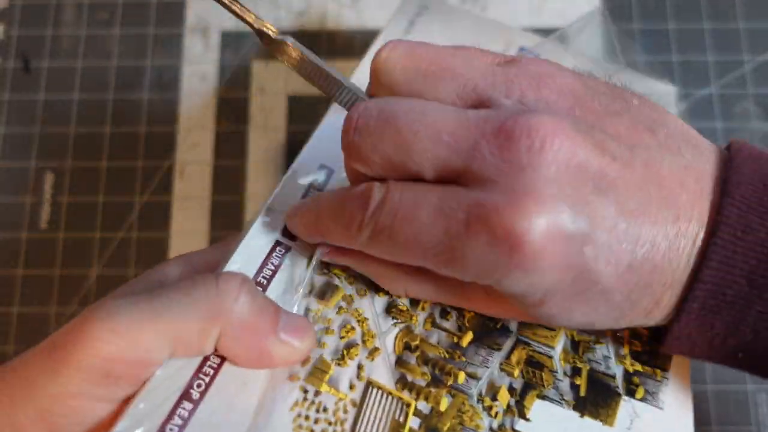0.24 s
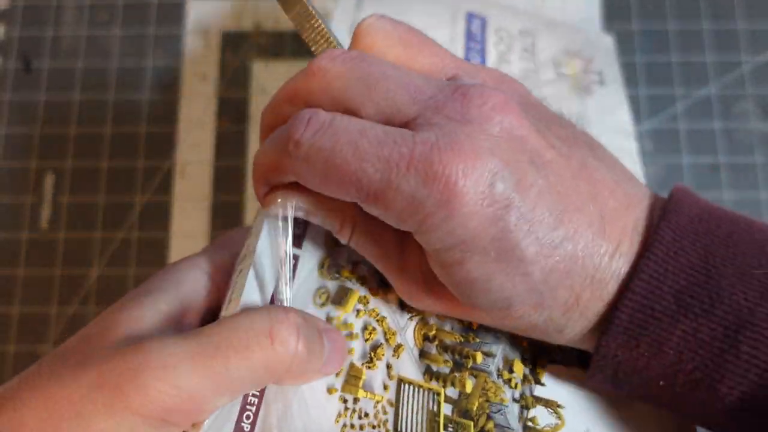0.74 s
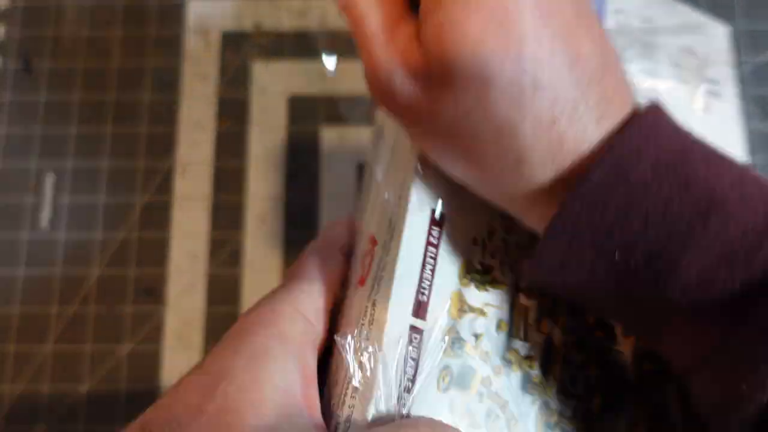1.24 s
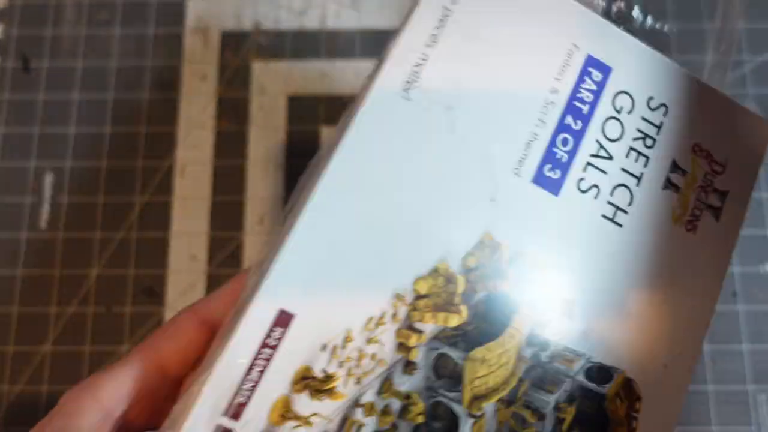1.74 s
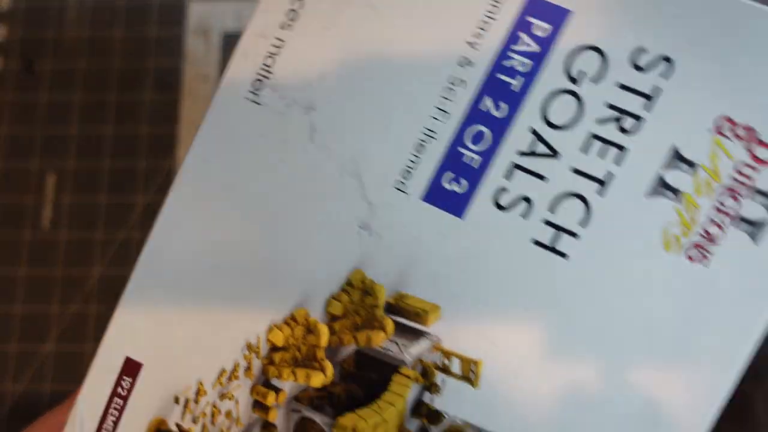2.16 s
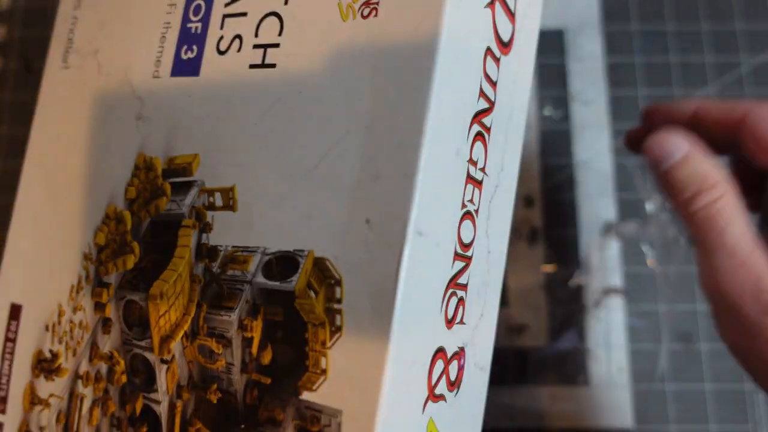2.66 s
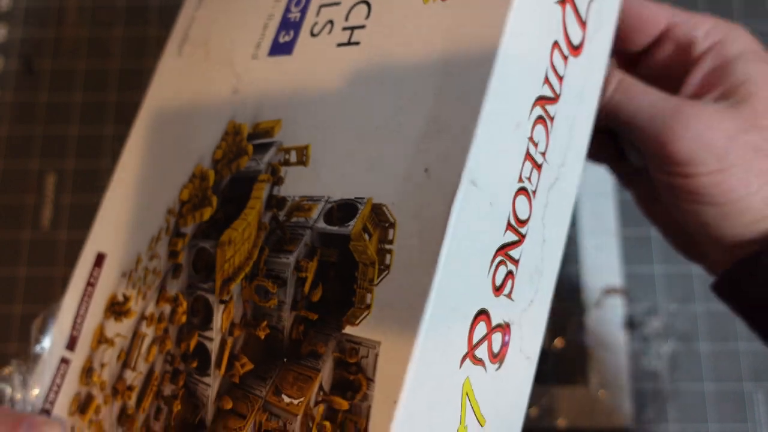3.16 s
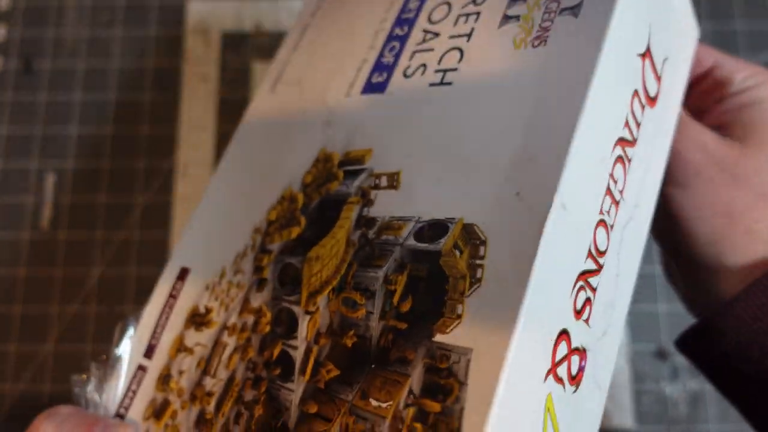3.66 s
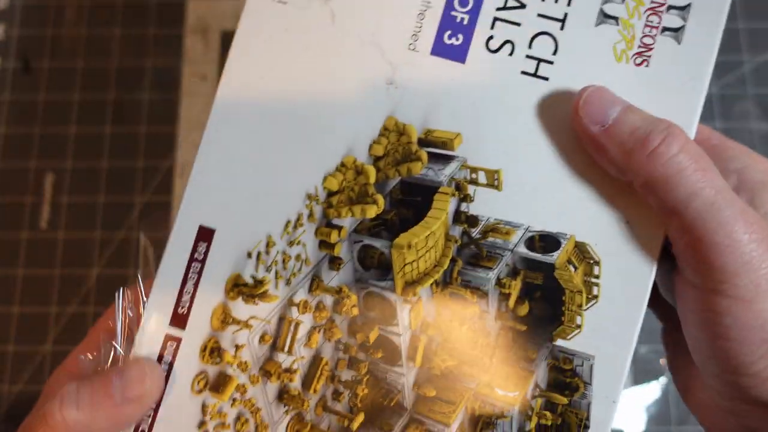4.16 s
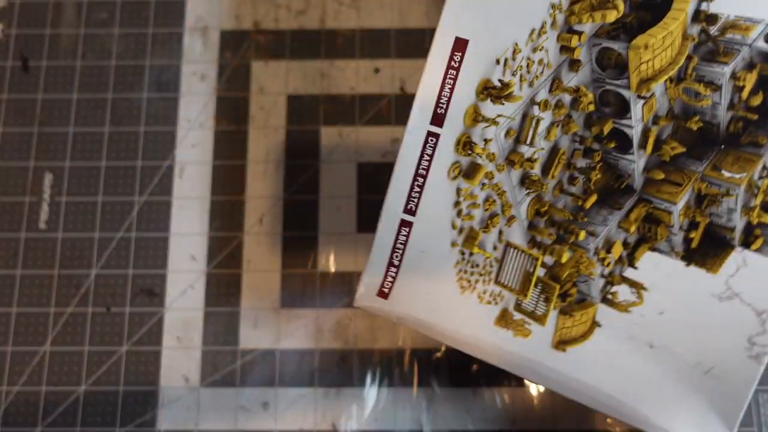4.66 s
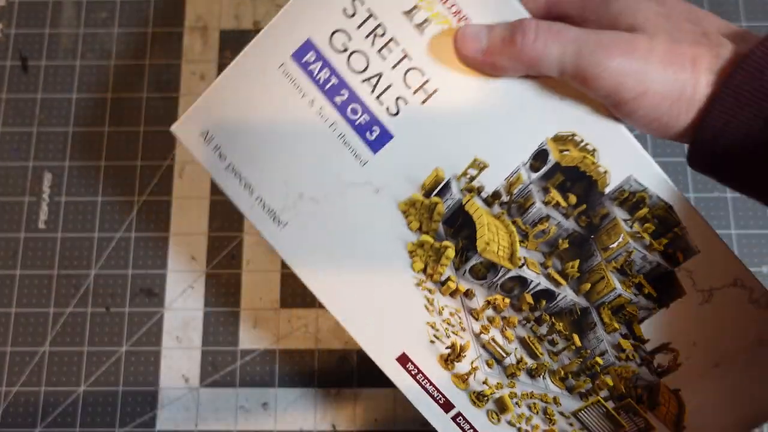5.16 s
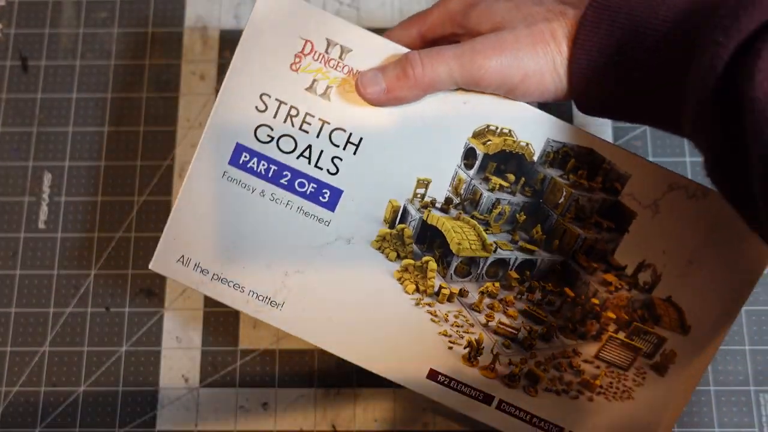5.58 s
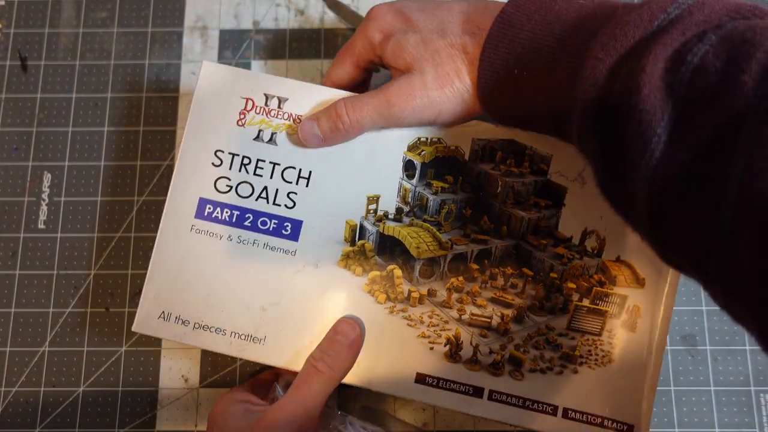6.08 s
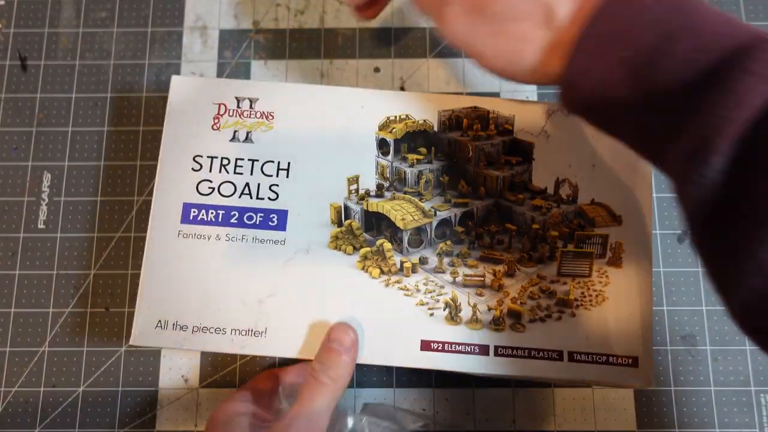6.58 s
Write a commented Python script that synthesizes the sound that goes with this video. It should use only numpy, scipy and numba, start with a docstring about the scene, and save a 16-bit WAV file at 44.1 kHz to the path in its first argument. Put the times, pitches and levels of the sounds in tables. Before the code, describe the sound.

Hands tear thin plastic wrap from a cardboard box: bright crackling comes in quick tugs, with sharp snaps and dull hollow knocks, strongest around one second. Peeling swishes continue, thin out to lighter handling, then surge again past four seconds. Softer crinkles and small bumps end it. Close stereo microphone, small quiet room, short reverberation.

```python
"""Shrink-wrap film torn and peeled off a cardboard box by hand: swarms of buckling clicks, a swish, louder snaps.
Random clicks and noise through resonances make the film; friction is dense stick-slip clicks.
Knocks excite the modes of the box, loose contents patter on its walls, drags sweep a hollow resonance.
Close reflections and a short reverberant tail answer; a quiet room background lies beneath."""
import sys
import numpy as np
from scipy import signal
from scipy.fft import rfft, irfft
from scipy.io import wavfile
from scipy.ndimage import uniform_filter1d
from numba import njit

SR = 44100
rng = np.random.default_rng(int(sys.argv[2]) if len(sys.argv) > 2 else 0)


def int16_out(signal):
    """Quantize to a 16-bit WAV file."""
    q = np.round(np.clip(np.atleast_2d(signal).T, -1, 1) * 32767)
    wavfile.write(sys.argv[1], SR, q.astype(np.int16))


N = 300759
TIME = np.arange(N) / SR


def undb(db):
    """Decibels to amplitude gain."""
    return 10 ** (np.asarray(db) / 20)


def unit(x):
    """Scale to rms 1."""
    return x / np.sqrt(np.mean(x ** 2) + 1e-18)


def at_level(sound, level_db):
    """Give a short sound the energy of 10 ms at this rms level."""
    return sound * undb(level_db) * np.sqrt(SR / 100) / np.linalg.norm(sound)


def add(track, start_s, sound):
    """Mix a sound into a track, cut at the track's end."""
    i = max(int(start_s * SR), 0)
    track[i:i + len(sound)] += sound[:max(N - i, 0)]


def resonate(x, hz, width_hz):
    """Two-pole resonance, gain 1 at its centre."""
    hz = min(hz, SR * 0.45)
    b, a = signal.iirpeak(hz, hz / min(width_hz, SR / 3), SR)
    return signal.lfilter(b, a, x)


def colour(x, points, size=2048):
    """Minimum-phase filter with the given (hz, gain_db) outline; clicks keep their sharp front."""
    hz, gain_db = np.transpose(points)
    bins_hz = np.maximum(np.fft.rfftfreq(size, 1 / SR), 1)
    outline_db = np.interp(np.log(bins_hz), np.log(hz), gain_db)
    cepstrum = irfft(np.log(undb(outline_db)))
    # fold the cepstrum onto positive time
    cepstrum[1:size // 2] *= 2
    cepstrum[size // 2 + 1:] = 0
    impulse = irfft(np.exp(rfft(cepstrum)))
    return signal.fftconvolve(x, impulse)[:len(x)]


def clicks(spread_db, count):
    """Sample positions and signed sizes of random clicks: many small, a few large."""
    when, size, sign = rng.random((count, 3)).T
    rarity = -np.log(size + 1 / 400)
    return (when * N).astype(int), np.sign(sign - 0.5) * undb(spread_db * rarity)


def steady(x, span_s):
    """Level out the running power, keeping the grain finer than span_s."""
    size = max(int(span_s * SR), 8)
    power = uniform_filter1d(uniform_filter1d(unit(x) ** 2, size), size)
    return unit(x) / np.sqrt(np.abs(power) + 1e-6)


def walk(count):
    """Random wander: straight lines between count normal draws spread over the scene."""
    return np.interp(TIME, np.linspace(0, TIME[-1], count), rng.standard_normal(count))


def burst(length_s, follow, size):
    """One pulse of height 1, then a decaying random run; follow is the run's norm before the pulse is set."""
    t_s = np.arange(size) / SR
    run = rng.standard_normal(size) * undb(6.46 * rng.standard_normal(size))
    run *= np.exp(-t_s / max(length_s, 1e-4))
    push = follow * run / np.linalg.norm(run)
    push[0] = 1
    return push


def swell(peak_s, build_s, let_go_s, swell_db=11):
    """Gain of a movement: rises by swell_db over build_s, falls by it over let_go_s, same slopes beyond."""
    before = (peak_s - TIME) / max(build_s, 0.005)
    after = (TIME - peak_s) / max(let_go_s, 0.005)
    return undb(-np.minimum(swell_db * np.maximum(before, after), 200))


# tugs at the film; tautness sets brightness:
# peak_s, build_s, let_go_s, crinkle_db, friction_db, bright_db_per_octave
TUG_TABLE = [(0.01, 0.023, 0.035, -36.5, -41.5, 6), (0.16, 0.029, 0.054, -32.5, -40, 6),
             (0.29, 0.23, 0.22, -31.5, -39.5, -1), (0.605, .06, 0.063, -35, -44, -3.5),
             (0.77, 0.12, 0.24, -44.5, -45, 0), (0.975, 0.056, 0.045, -29, -35, 0),
             (1.13, .1, 0.048, -37, -41.5, -5), (1.265, 0.1, 0.1, -29.5, -33.5, 4),
             (1.44, .08, 0.14, -33.5, -54, -2), (1.59, 0.12, 0.38, -37, -45, 0.5),
             (1.88, .11, 0.072, -26.5, -34, 2), (2.09, 0.23, 0.21, -35, -59, -2.5),
             (2.23, .07, 0.19, -35.5, -42.5, 1), (2.5, 0.074, 0.21, -44.5, -56, -4),
             (3.0, .17, 0.14, -38.5, -44.5, 6), (3.2, 0.11, 0.24, -41, -65, 0.5),
             (3.365, 0.071, .07, -38.5, -38.5, -2), (3.7, .2, 0.18, -49, -62, 2),
             (3.92, 0.12, .25, -37.5, -47, 2.5), (4.06, 0.1, 0.13, -37, -41.5, 3),
             (4.24, 0.14, 0.069, -29.5, -33, 14), (4.35, 0.059, 0.073, -24, -31, 1),
             (4.56, 0.091, 0.099, -35.5, -44, -0.5), (4.74, 0.088, 0.1, -27.5, -38, 1.5),
             (4.865, 0.15, .05, -34, -34, 0), (5.16, 0.16, .25, -37.5, -41, 2),
             (5.42, 0.11, .3, -34.5, -43, -1.5), (5.615, 0.082, 0.039, -31.5, -37.5, -0.5),
             (5.76, 0.068, 0.19, -44, -42, -2), (5.97, 0.088, 0.13, -40.5, -48.5, -1),
             (6.21, 0.057, 0.034, -42, -53, -4), (6.41, 0.13, 0.1, -46, -53, -4),
             (6.6, 0.038, 0.076, -48.5, -58, -5.5), (6.81, 0.091, .1, -35.5, -54, -3)]


def tugging():
    """Crinkle dB, friction dB, brightness: overlapping tugs add in power, which also weights the tautness."""
    film, friction, bright = 0, 0, 0
    for peak_s, build_s, let_go_s, film_db, friction_db, bright_db in TUG_TABLE:
        effort = swell(peak_s, build_s, let_go_s)
        power = (effort * undb(film_db)) ** 2
        film = film + power
        bright = bright + bright_db * power
        friction = friction + (effort * undb(friction_db)) ** 2
    return 10 * np.log10(film), 10 * np.log10(friction), bright / film


# colour of the crinkling film: hz, gain_db
FILM_COLOUR = [(150, -23), (400, -26), (1000, -17.5), (2000, -7.5), (4000, -1), (6000, 0.5), (8500, 1.5),
               (12000, -1.5), (16000, -8)]


def crinkle(bright_db, pull_db, spread_db=2.0, patchy_db=6, relative_width=0.6, bunch_db=4,
            swish_db=-5, swish_db_per_db=0.38, flutter_db=3):
    """Film facets buckle in bunches, ringing random mixes of broad bands; a strong pull merges them into a swish."""
    at, size = clicks(spread_db, count=14000)
    bunches = walk(count=700)
    size = size * undb(bunch_db * bunches[at])
    crackle, swish = np.zeros(N), np.zeros(N)
    for k, hz in enumerate(np.geomspace(600, 15000, 11)):
        width_hz = hz * relative_width
        tilt_db = bright_db * np.log2(hz / 8000)
        facet = undb(patchy_db * rng.standard_normal(len(at)) + tilt_db[at])
        pulses = np.bincount(at, size * facet, N)
        crackle += (-1) ** k * resonate(pulses, hz, width_hz)
        flutter = flutter_db * (bunches + walk(count=300)) / np.sqrt(2)
        noise = rng.standard_normal(N) * undb(tilt_db + flutter)
        swish += resonate(noise, hz, width_hz)
    crackle = steady(colour(crackle, FILM_COLOUR), span_s=0.03)
    swish = steady(colour(swish, FILM_COLOUR), span_s=0.03)
    merged = undb(swish_db + swish_db_per_db * (pull_db - np.median(pull_db)))
    return (crackle + merged * swish) / np.sqrt(1 + merged ** 2)


def small_snaps(film_db, above_db=-4, spread_db=4, follow_db_per_db=0.69, centre_hz=7600,
                spread_octaves=0.43, length_s=0.0024, count=70):
    """Lesser creases flip at random, louder under a harder pull; rows as in SNAP_TABLE."""
    when, size, pitch = rng.random((count, 3)).T
    # one per equal slot of time
    at = ((np.arange(count) + when) / count * (N - 1)).astype(int)
    usual_db = np.median(film_db)
    level_db = usual_db + follow_db_per_db * (film_db[at] - usual_db)
    level_db = level_db + above_db + spread_db * (2 * size - 1)
    hz = centre_hz * 2 ** (spread_octaves * (2 * pitch - 1))
    return list(zip(at / SR, level_db, hz, np.full(count, length_s)))


# creases that snap and short rips; level over 10 ms before the final colour, length before stretch:
# start_s, level_db, centre_hz, length_s
SNAP_TABLE = [(0.129, -29.5, 6450, 0.0045), (0.219, -21, 4450, 0.0054), (0.3405, -32, 4790, .0024),
              (0.451, -35, 7000, .001), (0.4549, -26, 8130, .002), (0.6997, -34, 6900, 0.0014),
              (0.775, -38.5, 4040, 0.0015), (0.864, -41, 5600, 0.0013), (0.952, -30.5, 2040, 0.0038),
              (0.985, -33, 1920, 0.0046), (1.1093, -27.5, 4300, 0.0012), (1.122, -31.5, 5800, 0.0036),
              (1.1525, -31, 1900, 0.0011), (1.1709, -25.5, 3600, 0.00071), (1.1825, -24, 6260, 0.00037),
              (1.198, -24, 5300, 0.0028), (1.222, -24.5, 1970, 0.04), (1.336, -27, 6740, .007),
              (1.399, -31.5, 11200, .0025), (1.4109, -35, 6830, .001), (1.438, -27.5, 6900, 0.0035),
              (1.461, -32.5, 10100, 0.00071), (1.498, -35, 6950, 0.0028), (1.562, -26.5, 8400, .0044),
              (1.6403, -28.5, 7900, 0.00052), (1.652, -35.5, 4120, 0.00087), (1.687, -34, 8640, .0025),
              (1.721, -30, 7600, 0.0041), (1.814, -28, 8880, 0.0045), (1.844, -30, 10100, 0.0074),
              (1.8886, -22, 5700, 0.026), (1.946, -34, 10000, .001), (1.98, -32, 6850, .005),
              (2.024, -32.5, 7900, 0.0037), (2.059, -29, 6460, 0.0063), (2.067, -28.5, 6900, 0.006),
              (2.117, -28, 5760, 0.0014), (2.156, -35, 6740, 0.0022), (2.1634, -32, 6620, 0.0009),
              (2.2, -31, 6670, 0.0088), (2.2185, -29, 5400, 0.0036), (2.2556, -35, 7340, .001),
              (2.347, -37.5, 8380, 0.0019), (2.4783, -37.5, 2440, 0.0036), (2.528, -36.5, 7000, 0.01),
              (2.6324, -42.5, 1490, 0.018), (2.8539, -50.5, 9400, .0025), (2.903, -25, 2920, 0.012),
              (2.913, -27, 2600, 0.0051), (3.139, -33, 6540, 0.01), (3.288, -32, 4760, 0.0026),
              (3.325, -30.5, 3300, 0.041), (3.3563, -31.5, 4200, 0.0078), (3.604, -45, 1760, 0.03),
              (3.6154, -34, 4750, .008), (3.8012, -32.5, 7060, 0.011), (4.234, -37, 6000, 0.012),
              (4.246, -24.5, 5700, 0.027), (4.3578, -32, 4500, 0.0031), (4.543, -35, 7680, .007),
              (4.796, -30, 7740, .001), (4.867, -31, 5500, 0.0076), (4.8813, -27.5, 8300, .001),
              (5.01, -40, 9200, .001), (5.3749, -37, 4900, .001), (5.734, -33.5, 2990, 0.03),
              (5.8485, -36, 4600, 0.0018), (6.3897, -37, 3280, .0026), (6.6546, -42, 7900, 0.00088)]


def snaps(creases, relative_width=1.0, cutoff=0.24, stretch=0.93, follow=0.82, lead_in_db=-13, lead_in_s=0.0028):
    """Faint clicks swell briefly into each snap; the longer the rip, the stronger the run of clicks after it."""
    out = np.zeros(N)
    for start_s, level_db, hz, length_s in creases:
        push = burst(length_s * stretch, follow * np.sqrt(abs(length_s) / 0.0019), size=3000)
        lead_in = burst(lead_in_s, follow=2.7, size=600)[::-1]
        lead_in *= undb(lead_in_db) * np.linalg.norm(push) / np.linalg.norm(lead_in)
        ring = resonate(np.r_[lead_in, push], hz, hz * relative_width)
        # a small facet radiates little below its own pitch
        high_pass = signal.butter(2, min(hz * cutoff, SR / 4), "high", fs=SR, output="sos")
        ring = signal.sosfilt(high_pass, ring)
        ring = resonate(ring, hz, 3 * hz)
        add(out, start_s - len(lead_in) / SR, at_level(ring, level_db))
    return colour(out, [(200, -33), (1000, 7), (4000, -1.5), (9000, 2.0), (16000, 0)])


# colour of skin and film sliding on card: hz, gain_db
SLIDE_COLOUR = [(100, -15), (400, 5.5), (900, -1.5), (1400, 0.5), (2500, 5), (4000, 2), (7000, -4.5),
                (16000, -27)]


def slide(spread_db=2.5, catch_db=5.0):
    """Dense stick-slip of skin and film on card, catching and letting go."""
    at, size = clicks(spread_db, count=24000)
    slips = np.bincount(at, size, N) * undb(catch_db * walk(count=700))
    return steady(colour(slips, SLIDE_COLOUR), span_s=0.074)


# modes of the box panels and cavity: hz, width_hz, gain_db
BOX_MODES = [(126.6, 28, -8), (150, 19, -0.5), (194.6, 35, -11.5), (213.7, 13.7, 1), (326, 240, -12),
             (347, 9.3, -4.5), (383, 44, -9.5), (463.3, 22, 5), (533, 120, -10.5), (628, 31, 3.5),
             (772, 110, -14.5), (911, 23, -1.5), (1070, 120, -16.5), (1320, 44, -0.5), (1366, 61, -11),
             (1688, 33, -7), (1810, 190, -13.5), (2315, 14, -8), (2430, 260, -23)]


def box(push, thud_db=-9):
    """The box rings in its modes over a dull, heavily damped thud."""
    ring = np.zeros(len(push))
    for k, (hz, width_hz, gain_db) in enumerate(BOX_MODES):
        ring += (-1) ** k * undb(gain_db) * resonate(push, hz, width_hz)
    return ring + undb(thud_db) * resonate(push, 487, 1070)


# blows from fingers, bench and contents; level over 10 ms, rattle before stretch, hollow against whole box:
# start_s, level_db, spot_hz, rattle_s, hollow_db
KNOCK_TABLE = [(0.074, -39.5, 573, 0.0068, -4), (0.125, -37, 1010, 0.017, -2),
               (0.218, -23.5, 500, 0.034, -27), (0.3287, -27.5, 333, 0.043, -17),
               (0.378, -36, 476, 0.0031, 8), (0.418, -30.5, 464, 0.0056, 8), (0.48, -33.5, 427, 0.0081, -4),
               (0.5034, -29.5, 466, .03, 3), (0.603, -29.5, 483, 0.028, 4), (0.783, -39.5, 356, 0.022, -1),
               (0.8143, -37.5, 750, 0.011, -7), (0.9501, -17, 356, 0.0033, -11),
               (0.962, -22.5, 452, 0.036, 3), (0.985, -17.5, 400, 0.0056, -8),
               (1.2075, -18, 1000, .004, -29), (1.21, -27, 248, .04, -4), (1.215, -16.5, 700, 0.069, -34),
               (1.231, -17.5, 460, 0.041, -9), (2.478, -30, 505, .004, 0), (2.634, -29.5, 552, 0.005, 9),
               (2.911, -22, 615, .012, 36), (3.29, -33, 455, 0.023, -1), (3.331, -29, 626, 0.02, -2),
               (3.6076, -31.5, 720, 0.012, -8), (3.682, -43.5, 680, .006, -4),
               (3.764, -38.5, 130, 0.062, -12), (3.876, -38.5, 732, 0.0041, -14),
               (3.91, -30, 630, 0.00093, 9), (3.948, -34.5, 500, 0.0023, 8), (4.0202, -29, 807, 0.0082, -6),
               (4.0404, -31.5, 990, .002, -8), (4.05, -29.5, 800, 0.005, 3.5),
               (4.0603, -31, 600, 0.0028, 2), (4.0684, -32, 760, 0.0033, -14),
               (4.125, -35.5, 804, 0.0035, -2), (4.334, -23.5, 760, 0.048, 6), (4.336, -32.5, 147, .02, 1),
               (4.3575, -24.5, 714, 0.0025, 5), (5.2876, -29.5, 344, .008, -9),
               (5.307, -31.5, 950, 0.021, -19), (5.368, -33.5, 1230, 0.0031, -4),
               (5.392, -35, 1190, 0.0066, -4), (5.638, -33, 635, 0.02, 0), (5.71, -33, 360, 0.16, -5),
               (5.829, -29.5, 745, 0.12, -25), (5.89, -32.5, 234, 0.0063, -17),
               (6.178, -34.5, 650, .017, -31), (6.267, -36.5, 304, 0.011, -9),
               (6.385, -36, 507, 0.045, -10), (6.557, -43.5, 297, .012, -2)]


def knocks(relative_width=1.83, broad_db=-11, tick_db=-13, hardness_db_per_octave=4, stretch=0.97,
           follow=0.97, hollow_width=0.11, narrowing=0.15):
    """Each blow rings the struck spot and the whole box, ticks on the card and adds a rattle."""
    out = np.zeros(N)
    for start_s, level_db, hz, rattle_s, hollow_db in KNOCK_TABLE:
        # a longer rattle is also stronger
        push = burst(rattle_s * stretch, follow * np.sqrt(abs(rattle_s) / 0.0076), size=14000)
        spot = resonate(push, hz, hz * relative_width)
        body = at_level(box(spot + undb(broad_db) * push), 0)
        # the spots that ring most are the least damped
        ring_hz = hz * hollow_width * undb(-narrowing * hollow_db)
        hollow = resonate(resonate(push, hz, ring_hz), hz, 2 * hz)
        hollow = at_level(hollow, hollow_db)
        # stiff, high-pitched spots tick harder
        hard_db = tick_db + hardness_db_per_octave * np.log2(hz / 500)
        tick = resonate(resonate(push, 1000, 5000), 1200, 8300)
        tick = at_level(tick, hard_db)
        add(out, start_s, at_level(body + hollow + tick, level_db))
    return out


def contents(spread_db=1.5, jostle_db=7.0, scrape_db=-9):
    """Loose pieces and dragging fingers patter on the box; its side walls add a higher buzz."""
    at, size = clicks(spread_db, count=2600)
    patter = np.bincount(at, size, N) * undb(jostle_db * walk(count=300))
    walls = unit(resonate(resonate(patter, 1280, 440), 1240, 1000))
    return steady(unit(box(patter)) + undb(scrape_db) * walls, span_s=0.031)


# the box tips and its contents shift: peak_s, settle_s, level_db
SHIFT_TABLE = [(0.01, 0.015, -32), (0.44, 0.084, -44.5), (0.98, 0.049, -34), (1.35, 0.11, -35),
               (1.88, 0.2, -44), (2.942, 0.032, -33), (3.39, 0.11, -43.5), (3.72, 0.45, -50.5),
               (4.05, 0.091, -37.5), (4.329, 0.085, -29), (4.76, 0.18, -42.5), (5.13, 0.14, -41),
               (5.28, 0.089, -38.5), (5.43, 0.061, -38.5), (5.67, 0.053, -43.5), (5.93, 0.066, -38.5),
               (6.15, 0.17, -48), (6.439, 0.043, -45)]


def tipping(build_share=0.88):
    """Gain of the contents, which slide and settle at each tip; build-up is a share of settle_s."""
    power = 0
    for peak_s, settle_s, level_db in SHIFT_TABLE:
        power = power + (undb(level_db) * swell(peak_s, build_share * settle_s, settle_s)) ** 2
    return np.sqrt(power)


@njit
def sweep(x, hz, width_hz):
    """State-variable band-pass whose centre moves every sample."""
    y, band, low = np.empty(len(x)), 0., 0.
    for i in range(len(x)):
        g = np.tan(np.pi * hz[i] / SR)
        k = width_hz / hz[i]
        v = (band + g * (x[i] - low)) / (1 + g * (g + k))
        band = 2 * v - band
        low = low + 2 * g * v
        y[i] = k * v
    return y


# the box dragged under the hand, pitch of the hollow: start_s, length_s, from_hz, to_hz, level_db
DRAG_TABLE = [(0.28, 0.46, 430, 514, -50), (1.72, 1, 303, 546, -53.5), (5.03, 0.46, 525, 610, -47.5),
              (6.25, 0.28, 570, 330, -49)]


def drag(width_hz=300.0, catch_db=4.5, fade_s=0.055):
    """Friction sounds the hollow under the hand; its pitch glides as the grip slides along the box."""
    hz = np.full(N, float(DRAG_TABLE[0][2]))
    gain = np.zeros(N)
    for start_s, length_s, from_hz, to_hz, level_db in DRAG_TABLE:
        end_s = start_s + length_s
        glide_hz = np.interp(TIME, [start_s, end_s], [from_hz, to_hz])
        hz = np.where(TIME < start_s, hz, glide_hz)
        fade = np.clip(np.minimum(TIME - start_s, end_s - TIME) / fade_s, 0, 1)
        gain += undb(level_db) * fade
    rub = rng.standard_normal(N) * undb(catch_db * walk(count=400))
    hollow = sweep(sweep(rub, hz, float(width_hz)), hz, float(width_hz))
    return unit(hollow) * gain


def scatter(x, near_s=0.002, far_s=0.016, drift_s=0.0007, count=9):
    """Bounces off hands, box and tools; path lengths wander at random, as with a box being turned."""
    out = np.zeros(N)
    for k, lag_s in enumerate(np.geomspace(near_s, far_s, count)):
        lag = np.abs(lag_s + drift_s * walk(count=14)) * SR
        source = np.maximum(np.arange(N) - lag.astype(int), 0)
        out += (-1) ** k * np.sqrt(near_s / lag_s) * x[source]
    return out / 2


# left-right difference of the reflections: hz, side_gain_db
SIDE_COLOUR = [(100, -16), (300, -20), (600, -8), (1200, -4.5), (4000, -5), (12000, -1.5)]


def room(x, early_db=-7, early_side_db=-9, tail_db=-14, tail_side_db=-17, tail_t60_s=0.36, tail_rise_s=0.028):
    """Near scatter and a short noise tail; the bass is nearly alike left and right."""
    t_s = np.arange(SR // 2) / SR
    envelope = (1 - np.exp(-t_s / tail_rise_s)) * undb(-60 * t_s / tail_t60_s)
    tails = rng.standard_normal((2, len(t_s))) * envelope
    tail_mid, tail_side = (signal.fftconvolve(x, tail / np.linalg.norm(tail))[:N] for tail in tails)
    mid = x + undb(early_db) * scatter(x) + undb(tail_db) * tail_mid
    side = undb(early_side_db) * scatter(x) + undb(tail_side_db) * tail_side
    side = colour(side, SIDE_COLOUR)
    return np.array([mid + side, mid - side])


# colour of the room's background: hz, gain_db
AIR_COLOUR = [(25, -4), (60, -9), (130, 1), (400, 8), (800, 1), (1500, -2), (6000, -4), (16000, -20)]


def background(level_db=-59.5):
    """Steady coloured noise, independent left and right."""
    air = [unit(colour(rng.standard_normal(N), AIR_COLOUR)) for _ in range(2)]
    return undb(level_db) * np.array(air)


def scene():
    """Film, friction and box sound together in the room; the background reaches each side separately."""
    film_db, slide_db, bright_db = tugging()
    wrap = crinkle(bright_db, pull_db=film_db) * undb(film_db)
    wrap = wrap + snaps(list(SNAP_TABLE) + small_snaps(film_db))
    card = slide() * undb(slide_db) + contents() * tipping() + drag() + knocks()
    return room(wrap + card) + background()


# microphone response: hz, gain_db
MIC_RESPONSE = [(25, -17), (60, -4), (120, 0.5), (250, 1.5), (500, 0.5), (1000, 2.5), (2000, 1.5),
                (4000, 1), (8000, 0.5), (16000, 1.5)]


def record(dry, ceiling=0.8, top_hz=16000):
    """The microphone thins the deep bass; the sharpest peaks are rounded off softly, and the recorder cuts the
    top."""
    heard = np.array([colour(channel, MIC_RESPONSE) for channel in dry])
    rounded = ceiling * np.tanh(heard / ceiling)
    low_pass = signal.ellip(10, 0.2, 80, top_hz, fs=SR, output="sos")
    return signal.sosfilt(low_pass, rounded)


dry = scene()
out = record(dry)
int16_out(out)
```